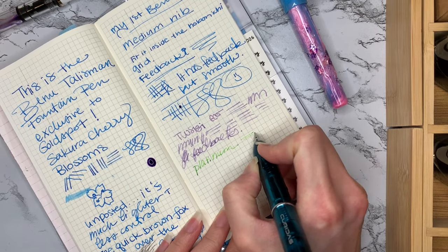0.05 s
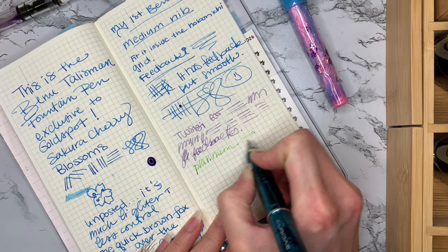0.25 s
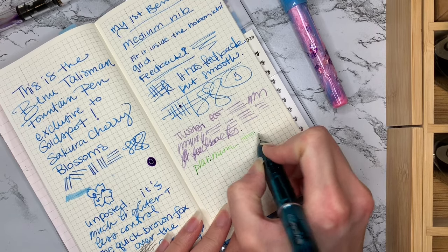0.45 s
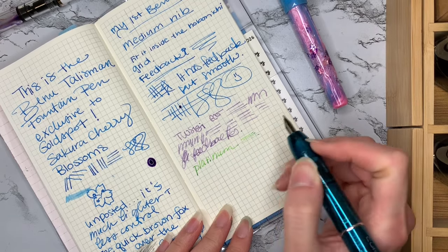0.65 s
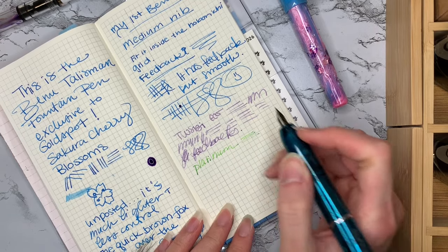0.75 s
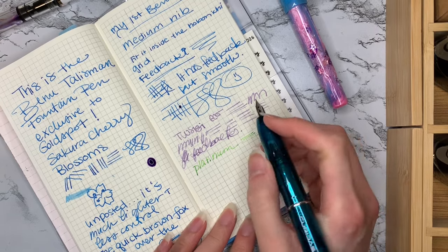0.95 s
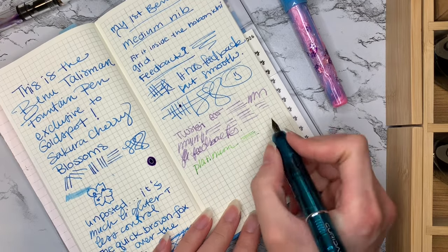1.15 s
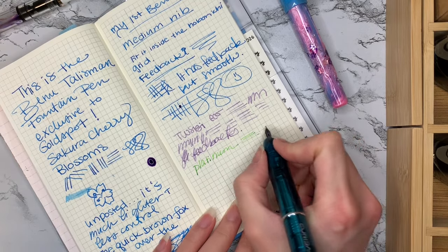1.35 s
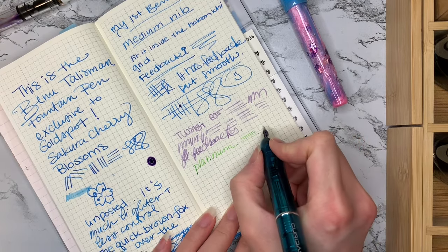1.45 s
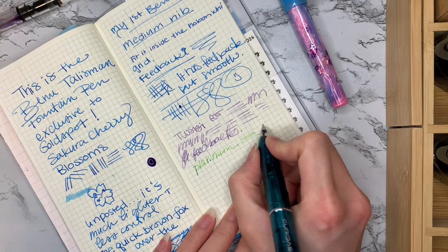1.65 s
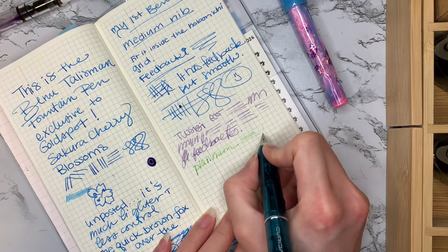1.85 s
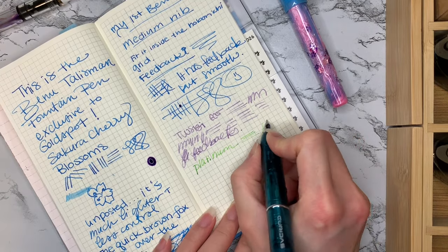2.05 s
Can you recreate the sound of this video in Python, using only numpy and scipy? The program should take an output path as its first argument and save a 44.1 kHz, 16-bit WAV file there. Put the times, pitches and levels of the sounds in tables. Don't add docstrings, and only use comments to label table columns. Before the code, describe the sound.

Fountain pen scratching briefly on paper, light knocks and a sliding hand between strokes, quiet room

```python
import sys
import numpy as np
from scipy import signal
from scipy.fft import rfft, irfft, next_fast_len
from scipy.io import wavfile
from scipy.ndimage import uniform_filter1d, map_coordinates

SR = 44100
rng = np.random.default_rng(int(sys.argv[2]) if len(sys.argv) > 2 else 0)


def wav_record(signal):
    frames = np.transpose(np.atleast_2d(signal))
    bounded = np.clip(frames, -1, 1)
    quanta = np.round(bounded * 32767).astype(np.int16)
    wavfile.write(sys.argv[1], SR, quanta)


def ratio(d):
    e = np.asarray(d, float) / 20
    return 10 ** e


N = 92610

# f/Hz, width/Hz, level/dB
DESK = [(169, 68, 5), (255, 49, 5), (450, 187, 0), (990, 310, -1.5), (1500, 670, -6.5)]


def unit(x):
    return x / np.sqrt(np.mean(x ** 2) + 1e-20)


def along(points, hz):
    f, v = np.transpose(points)
    return np.interp(np.log(hz + 1), np.log(f + 1), v)


def curves(rows):
    silent_db = -110
    s, db, *over_db = np.transpose(rows)
    t = np.arange(N) / SR
    return [np.interp(t, s, db + over, silent_db, silent_db) for over in (0, *over_db)]


def wobble(rate):
    knots = rng.standard_normal(int(N * rate / SR) + 4)
    return map_coordinates(knots, [np.arange(N) * rate / SR])


def filtered(x, response):
    m = next_fast_len(N + 8192)
    return irfft(rfft(x, m) * response(np.fft.rfftfreq(m, 1 / SR)), m)[..., :N]


def ringing(peaks):
    def response(f):
        total = 0
        for k, (centre, width, db) in enumerate(peaks):
            damping = 1j * f * width
            total = total + (-1) ** k * ratio(db) * damping / (centre ** 2 - f ** 2 + damping)
        return total
    return response


def fibres(spread_db, lumps_db, rate):
    size = np.minimum(rng.exponential(size=N), 4)
    return rng.standard_normal((2, N)) * ratio(spread_db * size + lumps_db * wobble(rate))


def scratch(db, hiss_db, page, tines):
    def page_response(f):
        return ringing(page)(f) * f ** 2 / (f ** 2 + 170.0 ** 2)

    def tine_response(f):
        return ringing(tines)(f) * f ** 4 / (f ** 4 + 1600.0 ** 4)
    body = filtered(fibres(spread_db=3.5, lumps_db=-1, rate=83), page_response)
    hiss = filtered(fibres(spread_db=1.5, lumps_db=1.5, rate=380), tine_response)
    return ratio(db) * unit(body) + ratio(hiss_db + 4.5) * unit(hiss)


def nib():
    # t/s, scratch level/dB, nib hiss over it/dB
    strokes = [
        [(.19, -65, -12), (.205, -53, -10), (.22, -35.5, -11.5), (.26, -25, -13.5), (.29, -31.5, -13.5),
         (.31, -38, -17), (.325, -58, -25), (.35, -77, -10)],
        [(1.7, -73, -14), (1.73, -46, -35), (1.752, -42.5, -22), (1.763, -32, -18.5), (1.8, -29.5, -15.5),
         (1.825, -32, -27), (1.84, -40, -38), (1.855, -73, -13), (1.9, -68, 1)],
    ]
    # centre t/s, half length/s, level/dB, nib hiss over it/dB
    touches = [
        (0.0, 0.015, -46.5, -25),
        (0.041, 0.033, -61, -17),
        (0.525, 0.056, -71, -20),
        (1.89, 0.025, -67, -15),
        (0.444, 0.019, -51.5, -6),
        (2.018, 0.011, -56, -17),
        (2.1, 0.023, -40, -25),
    ]
    # f/Hz, width/Hz, level/dB
    page_modes = [
        [(635, 133, 3), (880, 130, 4.5), (1100, 127, 5), (1504, 175, 1), (1967, 180, 0), (3080, 294, -5),
         (4380, 550, -12)],
        [(630, 160, -14.5), (845, 200, 5), (1100, 160, 3), (1442, 190, 5), (1684, 207, 4), (2040, 247, 0.5),
         (2960, 280, -21.5)],
    ]
    # f/Hz, width/Hz, level/dB
    tine_modes = [
        [(6330, 1350, -3.5), (7900, 320, 0), (8370, 340, 2), (10200, 2200, -3), (13100, 1300, -6.5),
         (15000, 890, -11.5)],
        [(3740, 300, -4), (4360, 170, 5.5), (5800, 220, 7), (7700, 450, 5.5), (9400, 1100, -11),
         (11100, 1100, -3), (12400, 1000, -10), (15300, 1000, -30)],
    ]
    t = np.arange(N) / SR
    out = 0
    for rows, page, tines in zip(strokes, page_modes, tine_modes):
        out = out + scratch(*curves(rows), page, tines)
    for s, half, db, over_db in touches:
        shape = db - 12 * ((t - s) / half) ** 2
        out = out + scratch(shape, shape + over_db, page_modes[1], tine_modes[0])
    return out


def taps():
    # t/s, peak level/dB, f/Hz, t60/s
    contacts = [(.163, -43, 2200, 0.011), (0.181, -48, 1500, 0.035), (.437, -25.5, 1620, 0.0085),
                (.438, -31.5, 450, 0.031), (0.4422, -42.5, 430, 0.024), (.441, -37, 724, 0.027),
                (.443, -40.5, 150, 0.13), (.679, -32, 1920, 0.026), (.688, -30.5, 1800, 0.016),
                (0.824, -43.5, 450, 0.068), (.8205, -41.5, 1740, 0.011), (.850, -37.5, 2146, 0.013),
                (.852, -44, 1100, 0.015), (.853, -38, 166, 0.061), (.868, -48, 1500, 0.018),
                (0.875, -36.5, 1237, 0.027), (.877, -43, 450, 0.053), (.878, -44.5, 740, 0.058),
                (1.003, -50, 467, 0.026), (1.125, -44.5, 1000, 0.025), (1.146, -48.5, 450, 0.054),
                (1.148, -43, 1340, 0.013), (1.149, -42.5, 159, 0.075), (1.16, -44, 715, 0.03),
                (1.182, -46, 172, 0.1), (1.236, -45, 567, 0.015)]
    # t/s, peak level/dB
    ticks = [
        (.0553, -46),
        (.1615, -39),
        (.4424, -41),
        (.851, -39),
        (1.022, -43),
        (1.639, -35),
        (2.0015, -40),
    ]
    # f/Hz, width/Hz, level/dB
    snap_colour = [(1500, 2000, -9), (9000, 6000, 1)]
    rise_s, tick_t60_s = 0.00084, 0.004
    partner, partner_db = 1.143, -18.5
    puff_db, puff_life = -10.5, 1.6
    t = np.arange(SR // 5) / SR
    out, shake, snaps = np.zeros((2, N + SR)), np.zeros(N + SR), np.zeros(N + SR)
    for s, db, hz, t60 in contacts:
        start = round(s * SR)
        at = slice(start, start + len(t))
        phase = rng.uniform(size=(2, 1, 1)) + [[0], [np.pi / 2]]
        pair = np.sin(2 * np.pi * hz * t + phase[0])
        pair = pair + ratio(partner_db) * np.sin(2 * np.pi * partner * hz * t + phase[1])
        soft_rise = (1 - np.exp(-t / rise_s)) ** 2
        out[:, at] += ratio(db + 4.5 - 60 * t / t60) * soft_rise * pair
        if hz < 1600:
            shake[at] += ratio(db + puff_db - 60 * t / (puff_life * t60))
    for s, db in ticks:
        snaps[round(s * SR):][:len(t)] += ratio(db - 60 * t / tick_t60_s)
    noise = rng.standard_normal((2, 2, N))
    thuds = filtered(3 * shake[:N] * noise[0], ringing(DESK))
    return out[:, :N] + thuds + filtered(snaps[:N] * noise[1], ringing(snap_colour))


def hand():
    # t/s, rub level/dB, skin hiss over it/dB, weight on the desk over it/dB
    slides = [
        [(.03, -79, -3, 16), (.07, -68, 13, -8), (.14, -79, 20, -16), (.165, -52, -8, -1), (.19, -55, -20, -4)],
        [(.69, -53.5, -14, -1.5), (.79, -67, 4, 9.5), (.845, -65.5, 0, 13), (.853, -54, -20, 6),
         (.865, -56.5, 5, 8), (.88, -49, -13, 5.5), (.9, -52, -2.5, 0.5), (.98, -54.5, -9, -3.5),
         (1.03, -48.5, 0, -3), (1.08, -48, 2, -31), (1.11, -49, 0.5, -4), (1.13, -63, 1, -7)],
        [(1.11, -61, 8, -12), (1.127, -53, 0, 1), (1.15, -51, -0.5, 3.5), (1.175, -52.5, 3.5, 3.5),
         (1.2, -57.5, 2.5, 2), (1.235, -66, -1, 6.5), (1.26, -67.5, -1, 2), (1.33, -67, -5, -19)],
    ]
    # f/Hz, width/Hz, level/dB
    rub_modes = [
        [(1540, 430, -4.5), (2130, 220, -3), (2800, 530, -7.5), (4550, 200, -36)],
        [(1500, 750, -6.5), (2134, 134, 5.5), (2770, 870, -12), (4360, 200, -28)],
        [(1000, 130, -3), (1630, 240, -1), (2180, 210, -0.5), (2900, 810, -11.5)],
    ]
    # f/Hz, level/dB per Hz
    skin_colour = [(3500, -9), (4800, -3.5), (5800, -1.5), (7500, -5), (8500, -2), (13000, -6),
                   (15500, -13)]
    out = 0
    for rows, page in zip(slides, rub_modes):
        db, hiss_db, desk_db = curves(rows)
        rub = filtered(fibres(spread_db=-0.5, lumps_db=3.0, rate=80),
                       lambda f: ringing(page)(f) * f ** 2 / (f ** 2 + 400.0 ** 2))
        skin = filtered(fibres(spread_db=3.0, lumps_db=2.0, rate=45), lambda f: ratio(along(skin_colour, f)))
        desk = filtered(fibres(spread_db=3.5, lumps_db=4.0, rate=82), ringing(DESK))
        out = out + ratio(db) * unit(rub) + ratio(hiss_db) * unit(skin) + ratio(desk_db) * unit(desk)
    return out


def walls(x):
    t60_s, level_db = 0.14, -20.5
    t = np.arange(SR // 3) / SR
    tail = uniform_filter1d(rng.standard_normal((2, len(t))), size=9) * ratio(-60 * t / t60_s)
    tail = tail / np.linalg.norm(tail[0])
    return ratio(level_db) * signal.fftconvolve(x, tail, axes=1)[:, :N]


def patchy(x):
    z = signal.stft(x, nperseg=512)[2]
    field = uniform_filter1d(rng.standard_normal(z.shape[1:]), 7, axis=0)
    field = uniform_filter1d(field, 12, axis=1)
    return signal.istft(z * ratio(1.8 * unit(field)), nperseg=512)[1][:, :N]


def room_tone():
    # f/Hz, level/dB per Hz
    hiss_colour = [(150, -14), (330, 4), (600, 9), (1000, 5.5), (2200, 1), (3000, 0), (4000, -4),
                   (8500, -2.5), (13000, -1), (15600, -19.5)]
    # f/Hz, level/dB per Hz
    rumble_colour = [(15, -71), (25, -52), (38, -6.5), (70, 2), (129, -7.5), (172, -10.5), (236, -14),
                     (299, -19), (500, -28), (650, -76), (1100, -120)]
    # f/Hz, width/Hz, rms level/dB
    hum_bands = [(56, 10.4, -58), (118.06, 10.5, -55.5), (246.6, 3.3, -67)]
    hiss_db, rumble_db = -58, -52

    def noise(shape):
        return unit(filtered(rng.standard_normal((2, N)), shape))
    hum = sum(ratio(db) * noise(ringing([(hz, w, 0)])) for hz, w, db in hum_bands)
    rumble_curve = rumble_colour + [(900, -34)]
    rumble = ratio(rumble_db + 0.5 * wobble(4.73)) * noise(lambda f: ratio(along(rumble_curve, f)))
    hiss = patchy(noise(lambda f: ratio(along(hiss_colour, f))))
    return ratio(hiss_db + 0.56 * wobble(0.79)) * hiss + rumble + hum


def ports(pair, lead, alike, pan):
    # f/Hz, phase/rad
    high_lead = [(4900, 3.0), (5300, 3.25), (7200, 6.28), (9300, 6.28), (11500, 9.42), (13000, 9.42),
                 (14900, 12.57)]
    # f/Hz, coherence 0-1
    high_alike = [(6700, .75), (7200, 1), (9400, 1), (10300, .8), (11300, 1), (13300, 1), (14200, .6),
                  (14900, 1)]

    def turn(hz):
        u = np.arccos(np.clip(along(alike + high_alike, hz), 0, 1)) / 2
        return np.array([np.cos(u), np.sin(u)])
    common, apart = filtered(pair, turn)
    f, rad = np.transpose(lead + high_lead)
    side = np.array([[.5], [-.5]])

    def balance(hz):
        return ratio(side * along(pan, hz)) * np.exp(1j * side * np.interp(hz, f, rad))
    return filtered(np.array([common + apart, common - apart]), balance)


def scene():
    # f/Hz, phase/rad
    lead_nib, lead_hand, lead_room = [(0, -1), (300, 0), (600, 0.43), (860, 0.37), (2000, 0.12),
                                      (2700, 2.13), (3250, 2), (3800, .5), (4550, 1.8)], [(350, 1.16), (700, 1.94), (1600, 0.2), (3400, 4.05),
                                                        (4000, 1.7)], [(100, 0), (220, 1), (380, 2.4),
                                                                           (600, 2.5), (3300, 3.5),
                                                                           (4000, 1.7)]
    # f/Hz, coherence 0-1
    alike_nib, alike_hand, alike_room = [(120, 0.92), (300, 0.58), (700, 0.83), (1500, 1), (2600, 0.38),
                                         (4000, 1), (4700, 0.77), (5400, 0.96)], [(100, 1), (600, 0.46), (2200, 0.36),
                                                            (3600, 0.24), (4800, 1), (5400, 0.89)], [(40, 0.92), (120, .9),
                                                                                (300, .4), (500, 0.65),
                                                                                (750, 0.86), (1200, 0.65),
                                                                                (1900, 0.2), (2800, 0.78),
                                                                                (4000, 0.41), (4800, 0.82),
                                                                                (5400, 0.91)]
    # f/Hz, level/dB
    pan_near, pan_room = [(60, 1), (200, -2), (700, -1.5), (1300, 0.2), (2400, -4.5), (4000, -2),
                          (6000, 1.8)], [(60, -0.6), (200, -1), (400, -0.8), (4000, 1.94)]
    pen = ports(nib() + taps(), lead_nib, alike_nib, pan_near)
    palm = ports(hand(), lead_hand, alike_hand, pan_near)
    room = ports(room_tone(), lead_room, alike_room, pan_room)
    return pen + walls(pen) + palm + room


def roll_off(x):
    return signal.sosfilt(signal.butter(12, 16900, fs=SR, output="sos"), x)


def record(dry):
    mix = filtered(dry, lambda hz: hz < 15830)
    return roll_off(mix)


dry = scene()
out = record(dry)
wav_record(out)
```